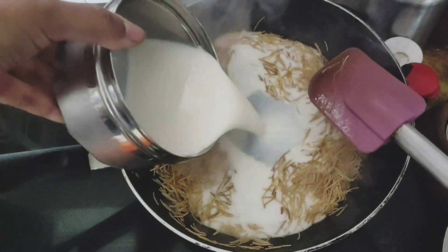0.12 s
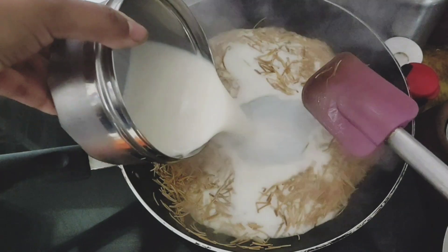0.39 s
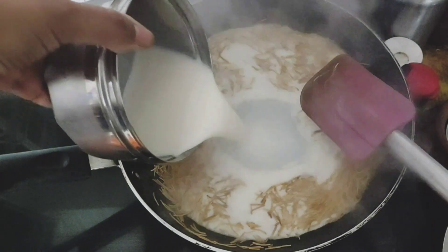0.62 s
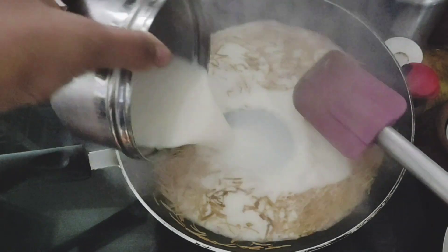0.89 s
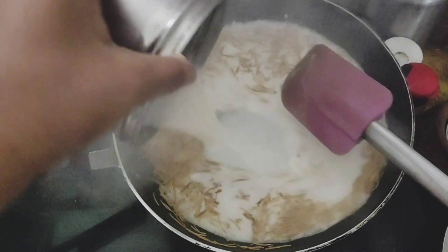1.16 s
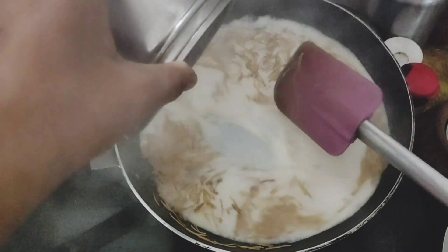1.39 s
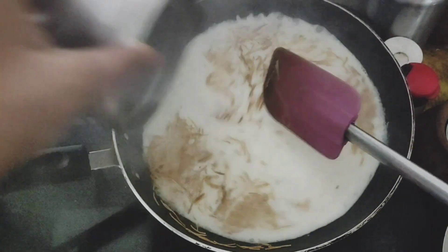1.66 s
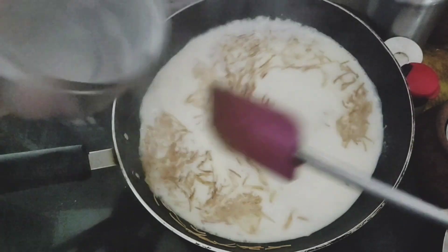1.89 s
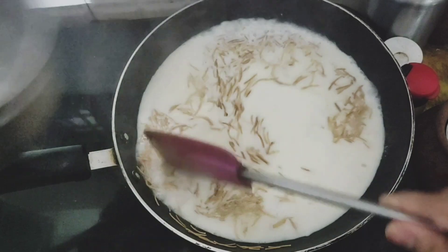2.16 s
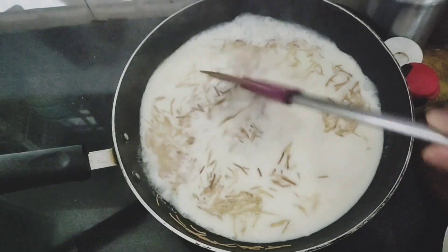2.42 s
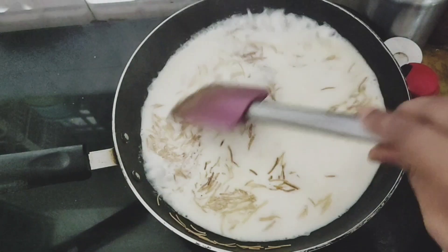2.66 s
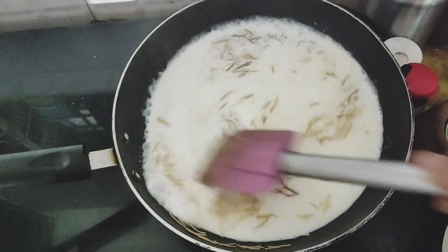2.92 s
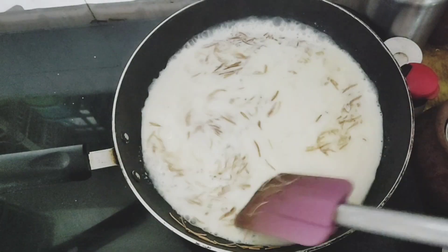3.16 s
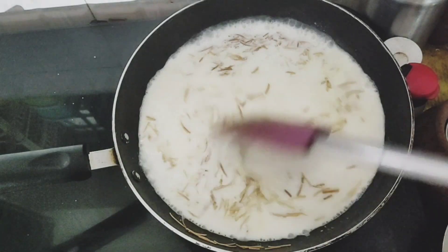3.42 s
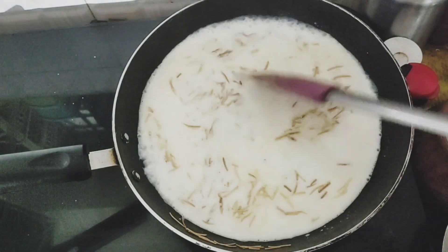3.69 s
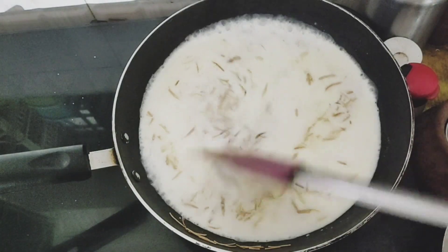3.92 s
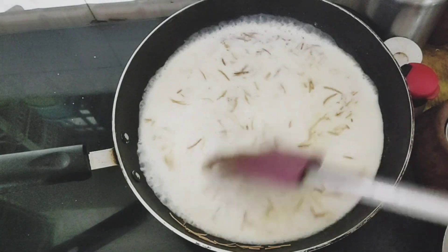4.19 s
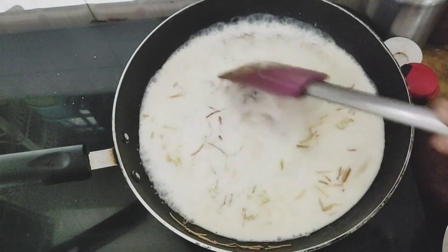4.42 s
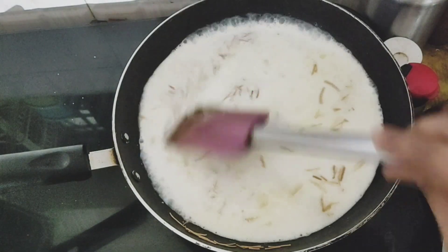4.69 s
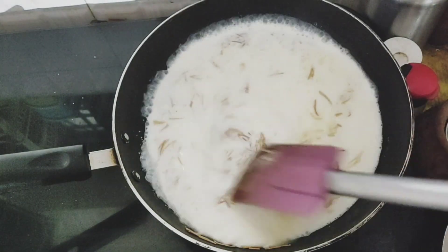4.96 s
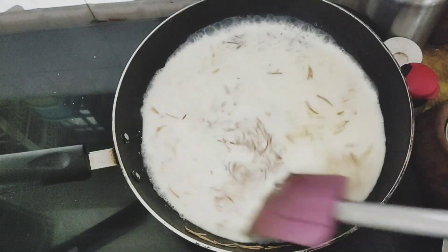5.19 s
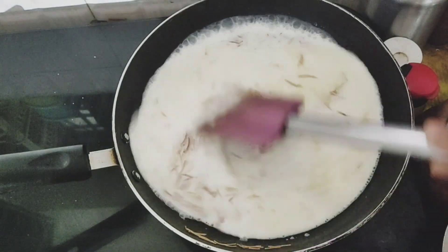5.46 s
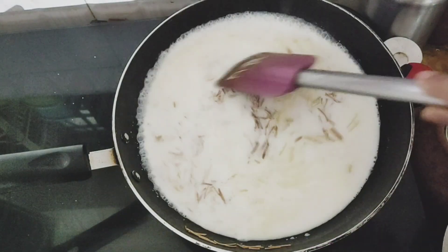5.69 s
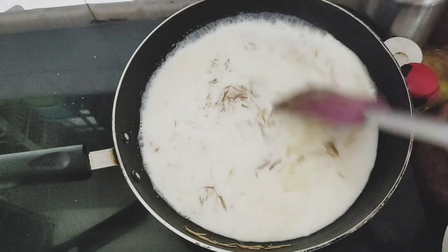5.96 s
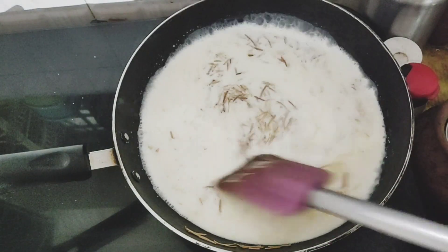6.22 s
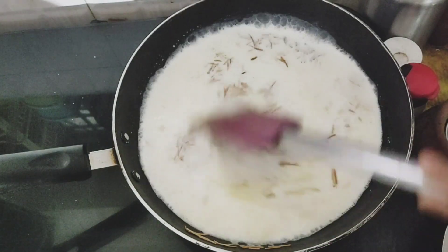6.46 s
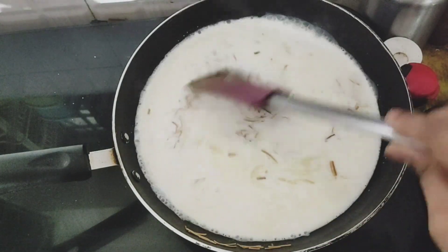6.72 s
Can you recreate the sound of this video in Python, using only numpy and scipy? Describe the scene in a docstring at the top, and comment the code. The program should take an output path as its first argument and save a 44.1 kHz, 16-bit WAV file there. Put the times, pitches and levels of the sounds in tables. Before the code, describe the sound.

Milk hisses fiercely on hot steel, fading unevenly over a low burner rumble; small spatula knocks, then thin steam squeaks and sparse bubbles.

```python
"""Milk boils off the hot steel of a pan: a dense sizzle of bursting and ringing bubbles over hiss fades, then is quenched.
Noise bursts spit; a spatula knocks and scrapes the pan wall, ringing its modes; the last bubbles at the rim squeak
as thin breathy whistles, and a sparse simmer remains. A burner rumbles in filtered noise over a faint hum of sines,
and a puff of air pushes each microphone of a spaced pair."""
import sys
import numpy as np
from scipy import signal
from scipy.io import wavfile
from scipy.ndimage import uniform_filter1d

SR = 44100
rng = np.random.default_rng(int(sys.argv[2]) if len(sys.argv) > 2 else 0)


def log_audio(samples):
    """Write samples as a 16-bit WAV file to the path given in sys.argv[1]."""
    # one column per channel
    frames = np.atleast_2d(samples).T
    # limit to full scale, then quantise
    limited = np.clip(frames, -1, 1)
    pcm = np.round(limited * 32767).astype(np.int16)
    wavfile.write(sys.argv[1], SR, pcm)


def how_loud(loudness_db):
    """Turn decibels into a plain amplitude multiplier (0 dB gives 1, 20 dB gives 10)."""
    steps = np.asarray(loudness_db, float) / 20
    return 10 ** steps


N = 301644  # samples


def evened(x):
    """Scales to rms 1."""
    return x / np.sqrt(np.mean(abs(x) ** 2) + 1e-20)


def read(points, hz):
    """Reads a table on a log-frequency axis."""
    f, value = np.transpose(points)
    return np.interp(np.log(hz + 1), np.log(f + 1), value)


def add(mix, start_s, sound):
    """Mixes a sound in at start_s."""
    part = mix[..., round(start_s * SR):][..., :sound.shape[-1]]
    part += sound[..., :part.shape[-1]]


def bell(hz, center_hz, width_hz):
    """Gaussian bump of height 1 over frequency."""
    return np.exp(-0.5 * ((hz - center_hz) / width_hz) ** 2)


def band(x, order, lo_hz, hi_hz):
    """Butterworth band-pass."""
    return signal.lfilter(*signal.butter(order, [lo_hz, hi_hz], "band", fs=SR), x)


def wander(t, lo_hz, hi_hz):
    """Slow chance of rms 1: sines of random phase."""
    rates_hz = np.geomspace(lo_hz, hi_hz, num=30)
    return evened(sum(np.sin(2 * np.pi * (f * t + rng.random())) for f in rates_hz))


def pair(a, b, size, field_db):
    """Colours two unrelated signals by a dB field and blends them into a left-right pair."""
    # likeness of left and right: (frequency [Hz], share [0-1])
    likeness = [(60, 1), (140, 0.92), (210, 0.34), (330, 0.93), (500, 0.71), (770, 0.65), (1400, 0.39),
                (2200, 0.14), (3500, 0.2), (8000, 0.02)]
    # path difference to the spaced microphones: (frequency [Hz], phase by which left leads [rad])
    lead = [(0, -0.3), (1400, 0.0), (2500, 0.0), (3900, -3), (9100, -8.8), (15300, -14)]
    overlap = size - size // 4
    hz, t, z = signal.stft([a, b], SR, nperseg=size, noverlap=overlap)
    power = uniform_filter1d((abs(z) ** 2).mean((0, 2)), size=9)
    z = z / np.sqrt(power)[:, None]
    same = np.clip(read(likeness, hz), 0, 1)[:, None]
    phase_rad = np.interp(hz, *np.transpose(lead))[:, None]
    left = (same * z[0] + np.sqrt(1 - same ** 2) * z[1]) * np.exp(1j * phase_rad)
    both = np.array([left, z[0]]) * how_loud(field_db(hz[:, None], t))
    return signal.istft(both, SR, nperseg=size, noverlap=overlap)[1][:, :N]


def bubbles(per_s, spread_db, cycles):
    """Bursting bubbles of many sizes, each a few cycles of rising pitch."""
    out = np.zeros((2, N))
    for hz in np.geomspace(350, 15000, num=16):
        u = np.arange(round(3 * cycles * SR / hz)) * hz / SR  # time in cycles
        pop = np.sin(2 * np.pi * u * (1 + 0.02 * u)) * np.exp(-u / cycles) * np.minimum(u / 0.27, 1)
        pop = evened(pop) / np.sqrt(len(u))
        share = hz / 60000  # small bubbles are the more numerous
        when, big = rng.random((2, 2, N))
        size_db = spread_db * np.minimum(-np.log(big + 1e-9), 5)
        train = (when < per_s * share / SR) * how_loud(size_db)
        out += signal.oaconvolve(train / np.sqrt(share), pop[None], axes=1)[:, :N]
    return evened(out)


def ringers(count, spread_db, cycles):
    """Bubbles held under the skin of the milk ring for many cycles, each at its own gliding pitch."""
    out = np.zeros((2, N))
    for when, size, big, side, glide in rng.random((count, 5)):
        hz = 400 * 35 ** size
        u = np.arange(round(3 * cycles * SR / hz)) * hz / SR  # time in cycles
        ring = np.sin(2 * np.pi * u * (1 + 0.0388 * (glide - 0.3) * u / cycles))
        ring = ring * np.exp(-u / cycles) * np.minimum(u / 6, 1)
        size_db = -spread_db * np.log(big + 0.018)
        add(out[int(side < 0.5)], when * N / SR, how_loud(size_db) * ring)
    return evened(out)


def sizzle():
    """Bubble bursts over their diffuse hiss, surging as milk washes over hot steel."""
    # boil at the rim, flaring when stirring bares hot steel: (time [s], level before side gain and swell [dB])
    boil = [(0.0, -19), (0.55, -19), (1.2, -24), (1.76, -27), (1.82, -24.5), (1.87, -27), (1.95, -27.5),
            (2.08, -28), (2.21, -31.5), (2.35, -29), (2.95, -31.5), (3.2, -29), (3.25, -29.5), (3.3, -33),
            (3.41, -32), (3.46, -35), (3.5, -33), (3.58, -35), (3.83, -33), (4.06, -35.5), (4.19, -33),
            (4.28, -33.5), (4.4, -36), (4.45, -35), (4.65, -37.5), (4.89, -36), (4.97, -34), (5.005, -33),
            (5.035, -35), (5.075, -36), (5.13, -32), (5.22, -34.5), (5.39, -38), (5.57, -38), (5.64, -45.5),
            (5.78, -53.5), (6.11, -54.5), (6.19, -51.5), (6.27, -52), (6.84, -56)]
    # basic spectrum: (frequency [Hz], relative density [dB per Hz])
    fizz = [(88, -40), (150, -17.5), (296, -10.5), (404, -8), (563, -7), (711, -5), (1090, -7), (1580, 1.5),
            (6920, -5.5), (8900, -4.5), (15600, -8)]
    # resonances and dips of pan bowl and microphone: (centre [Hz], width [Hz], gain before depth share [dB])
    bowl_modes = [(265, 24, -6), (408, 49, 1), (530, 11.5, 4.5), (575, 40, -11.5), (721.6, 13, 6),
                  (872, 22, 7), (1017, 57, 5.5), (1204, 15, 7.5), (1720, 32, -3), (2090, 30, -1.5),
                  (3020, 100, 0.5), (3800, 590, 2.5), (7500, 830, -2), (8640, 670, 4)]
    # colour, each column taken about its mean: (time [s], treble over sizzle [dB], low mids over sizzle [dB])
    colours = [(0.0, -3, -13), (1.3, -2, -8.5), (3.0, -1, -8), (3.25, -2, -7.5), (3.32, -4.5, -9),
               (3.55, -4, -10), (3.9, -3, -10.5), (4.25, -2.5, -9), (4.35, -4, -10), (4.6, -2.5, -10.5),
               (5.5, -1, -9.5), (5.64, -6.5, -11), (5.85, -0.5, -8.5), (6.19, 4, -5.5), (6.27, -1, -5.5),
               (6.84, 0, -9)]
    # mids: (time [s], 2-3 kHz over 1-1.7 kHz [dB], bowl resonance depth [share], nearby echo [0-1])
    mids_shape = [(0.0, -1.5, 1.1, 0.05), (.4, 0.5, 0.97, 0.1), (1.0, -2.5, 1.05, 1), (1.58, 2, 0.74, 0.8),
                  (1.75, -4.9, 0.72, 0.3), (2.4, -0.5, 1.04, 0), (2.95, 1.5, 0.91, 0), (3.2, 4, 1.1, 0.2),
                  (3.3, 1, 1.1, .1), (3.6, 0.3, 1.07, .05), (4.4, 1, 1.27, .05), (4.9, -1.7, 1.01, .05),
                  (5.12, 3.5, 0.97, .05), (5.5, -0.5, 1.4, 0.4), (5.7, 0.5, 0.45, .05),
                  (6.84, 3, 0.41, .05)]
    # colour that the nearby echo adds at full share: (centre [Hz], width [Hz], gain [dB])
    near_echo = [(794, 90, 1), (1026, 48, -9)]
    boil_s, level_db = np.transpose(boil)
    colour_s, treble_db, foam_db = np.transpose(colours)
    mids_s, *mids = np.transpose(mids_shape)
    bursts = bubbles(per_s=9000., spread_db=1.0, cycles=1.36)
    rings = ringers(count=2500, spread_db=2.0, cycles=39.0)
    drive = 0.55 * bursts + 0.28 * rings + 0.71 * rng.standard_normal((2, N))

    def field_db(hz, t):
        """Spectrum over time in dB: bowl, echo, colour, patches and surge."""
        below_peak_db = np.interp(t, boil_s, level_db - level_db.max())
        octave = np.log2(np.maximum(hz, 100) / 3000)

        tilt_db, depth, near = (np.interp(t, mids_s, v) for v in mids)
        bowl = sum(db * bell(hz, f, w) for f, w, db in bowl_modes)
        echo = sum(db * bell(hz, f, w) for f, w, db in near_echo)
        tilt = bell(hz, 2500, 550) - bell(hz, 1350, 350)
        bowl = bowl * depth + echo * near + 0.5 * tilt * tilt_db

        patches = rng.standard_normal((len(t), len(hz))).T
        patches = uniform_filter1d(patches, size=7, axis=0)
        patches = evened(uniform_filter1d(patches, size=20, axis=1))
        patches = patches * (1.05 - 0.02 * below_peak_db)  # dB, patchier as the boil weakens

        high = np.clip(octave - 0.6, 0, 1)
        low = np.clip((-octave - 1.1) / 0.5, 0, 1)
        treble = np.interp(t, colour_s, treble_db - treble_db.mean()) + 0.9 * wander(t, 1.605, 13.0)
        foam = np.interp(t, colour_s, foam_db - foam_db.mean()) + 0.43 * wander(t, 1.9, 8.5)
        colour = high * treble + low * foam
        # a weaker boil is duller on top and thinner at the bottom
        colour = colour + 0.28 * np.clip(octave - 1.6, 0, 1) * below_peak_db
        colour = colour + 0.18 * np.clip((-octave - 3.1) / 0.3, 0, 1) * below_peak_db

        surge = wander(t, 5., 40.) * (0.66 + 0.17 * np.maximum(octave + 1, 0))  # treble surges most
        return read(fizz, hz) + bowl + colour + patches + surge

    steady = pair(*drive, size=1024, field_db=field_db)
    middle = band(steady, 2, 1200, 5000)  # its power sets the level
    power = uniform_filter1d((middle ** 2).mean(0), size=16000)
    t = np.arange(N) / SR
    swell_db = -0.28 * wander(t, 2.5, 8.)
    return steady / np.sqrt(power) * how_loud(np.interp(t, boil_s, level_db) + swell_db)


def burner():
    """Lumpy low roar of the flame, filtered noise, and a faint hum of steady sines."""
    # burner: (time [s], rumble before side gain [dB], hum before partial levels [dB])
    flame = [(0.0, -52, -59.5), (1.0, -56.5, -61), (1.29, -49.5, -62), (2.0, -57, -59),
             (2.11, -49.5, -55.5), (2.66, -54, -61), (2.72, -45, -51.5), (2.8, -48, -54), (2.88, -45, -57),
             (2.96, -56, -58), (3.07, -52, -58), (3.2, -54, -52.5), (3.4, -54, -64), (3.69, -58, -63),
             (3.76, -49, -59), (3.83, -53, -59), (3.87, -45, -59), (4.04, -44.5, -59), (4.09, -52, -60.5),
             (4.5, -50, -58), (5.45, -55, -65), (5.7, -61, -63.5), (5.8, -51.5, -64.5), (6.0, -56, -65),
             (6.55, -55, -66), (6.72, -54, -65), (6.84, -48, -64)]
    # roar spectrum: (frequency [Hz], relative density [dB per Hz])
    roar_shape = [(12, -55), (20, -5), (37, -45), (82, 0.5), (101, 7), (113, 5.5), (126, 5), (145, 0),
                  (170, 1.5), (258, -17), (338, -7), (369, -18), (490, -9), (700, -34), (910, -54),
                  (1540, -120)]
    # hum partials: (frequency [Hz], relative level [dB])
    hum_partials = [(166.8, -4), (333.7, 0)]
    t = np.arange(N) / SR
    flame_s, roar_db, hum_db = np.transpose(flame)

    def field_db(hz, frame_s):
        """Roar spectrum, its level wavering."""
        return read(roar_shape, hz) + 1.5 * wander(frame_s, 3., 20.0)

    roar = pair(*rng.standard_normal((2, N)), size=2048, field_db=field_db)
    roar = evened(roar) * how_loud(np.interp(t, flame_s, roar_db)) * how_loud([[0.7], [-0.7]])
    hum = sum(how_loud(db) * np.sqrt(2) * np.sin(2 * np.pi * (hz * t + rng.random())) for hz, db in hum_partials)
    return roar + hum * how_loud(np.interp(t, flame_s, hum_db))


def puffs():
    """A fast push of air amid low buffeting; the capsule vent lets it swing back below rest."""
    # first on the left microphone, second on the right:
    # (time [s], push peak [dB], decay constant [s], buffeting before its envelope [dB])
    gusts = [(0.4094, -3, 0.00098, -41), (0.7213, -17.5, 0.00077, -45)]
    buffet_s, buffet_hz = 0.03, 250.
    out = np.zeros((2, N))
    t, now = np.arange(2000) / SR, np.arange(N) / SR
    vent = signal.butter(2, 100., "high", fs=SR)
    for side, (start_s, db, decay_s, buffet_db) in enumerate(gusts):
        push = np.minimum(t / decay_s / 0.47, 1) * np.exp(-t / decay_s)
        swing = signal.lfilter(*vent, push)
        add(out[side], start_s, how_loud(db) * swing / swing.max())
        low_air = signal.lfilter(*signal.butter(2, buffet_hz, fs=SR), rng.standard_normal(N))
        air = evened(signal.lfilter(*vent, low_air))
        add(out[side], 0, how_loud(buffet_db) * air * np.exp(-abs(now - start_s) / buffet_s))
    return out


def spits():
    """Larger bubbles spit: each a sharp decaying burst of noise coloured around its pitch."""
    # (time [s], level of the resonant part at the start [dB rms], pitch [Hz], t60 [s])
    bursts = [(1.792, -17, 4080, .04), (1.8123, -16, 3000, .05), (2.1177, -21, 1990, .035),
              (2.168, -23, 2560, .035), (2.3456, -15.5, 2000, .04), (3.0008, -20, 2590, .03),
              (3.4, -25, 1580, .035), (3.501, -26, 3990, .035), (3.631, -26, 2000, .015),
              (3.829, -23, 3300, .035), (4.489, -16, 3000, .006), (5.913, -44, 5500, .05),
              (6.422, -44, 2300, .02), (6.493, -41, 2540, .03), (6.512, -45, 2540, .03),
              (6.69, -45, 1700, .02)]
    out, t = np.zeros((2, N)), np.arange(3000) / SR
    for start_s, db, hz, t60_s in bursts:
        noise = rng.standard_normal((2, len(t)))
        ring = signal.lfilter(*signal.iirpeak(hz, 1.8, SR), noise)
        burst = evened(ring) + 0.6 * band(noise, 2, 700., 13000.)
        add(out, start_s, how_loud(db - 60 * t / t60_s) * np.minimum(t / 0.00075, 1) * burst)
    return out


def knocks():
    """A spatula's blow rings the pan modes through early room sound; its scrape stirs the damped modes."""
    # spatula on the pan wall: (time [s], blow [dB], scrape [dB rms], scrape length [s])
    blows = [(4.666, -38, -31, .066), (4.79, -49, -42, .02), (4.986, -43, -31, .045)]
    # pan modes: (frequency [Hz], relative level before chance [dB], undamped t60 [s])
    pan_modes = [(326, -15, .08), (455, -7, 0.18), (516, -1, 0.1), (576, -1, 0.32), (810, -1.5, 0.19),
                 (928, 4.5, 0.14), (1400, 2, 0.14), (1560, -15, .15), (2120, 0, 0.18), (2600, -1, 0.08),
                 (3990, 5, 0.065), (4500, 1, 0.07), (6800, -3, 0.1), (8240, 1, 0.1), (8570, 2, 0.099),
                 (8900, -1, .1)]
    rise_s, scrape_ring_db = 0.003, 0.5
    contact_damping = 0.5  # share of t60 left while touching
    out, t = np.zeros((2, N)), np.arange(20000) / SR
    for start_s, db, scrape_db, length_s in blows:
        chance = rng.random((len(pan_modes), 2))

        def modes(t60_share):
            """Sum of decaying sines."""
            return sum(how_loud(mode_db + 3.2 * v - 60 * t / (t60_s * t60_share)) * np.sin(2 * np.pi * (hz * t + p))
                       for (hz, mode_db, t60_s), (p, v) in zip(pan_modes, chance))

        ring, damped = modes(1), modes(contact_damping)
        room = rng.standard_normal((2, 6000)) * how_loud(-60 * t[:6000] / 0.33)
        room = room / np.linalg.norm(room[0])
        wet = signal.fftconvolve(ring[None], room, axes=1)[:, :len(t)]
        add(out, start_s, how_loud(db) * np.minimum(t / rise_s, 1) * (ring + 1.5 * wet))

        count = round(length_s * SR)
        rub = rng.standard_normal((2, SR // 5))[:, :count] * signal.windows.tukey(count, 0.35)
        add(out, start_s, how_loud(scrape_db) * evened(band(rub, 1, 500., 4000.)))
        stirred = signal.fftconvolve(rub, damped[None] / np.linalg.norm(damped), axes=1)
        add(out, start_s, how_loud(scrape_db + scrape_ring_db) * stirred)
    return out


def squeaks():
    """Thin breathy whistles of nearly level, slightly wavering pitch: a weak core in a sputtering fringe."""
    # steam from single spots: (start [s], length [s], nominal pitch [Hz], level before fades [dB rms])
    whistles = [(5.053, 0.12, 2680, -38), (5.09, .04, 1595, -41), (5.6, .09, 3200, -45),
                (5.67, .1, 3250, -50), (5.54, .07, 1450, -42), (5.59, .03, 1550, -48),
                (5.67, 0.1, 1500, -49), (5.641, 0.051, 1160, -54), (5.66, 0.11, 3600, -53),
                (5.571, 0.12, 2620, -49), (5.57, .08, 4500, -48), (5.7, .04, 4450, -52),
                (5.64, 0.17, 5870, -57), (5.76, .12, 3250, -57), (5.87, .09, 3300, -57),
                (5.858, 0.11, 8830, -46.5), (5.898, 0.094, 12100, -53), (6.127, 0.096, 9200, -49),
                (6.07, .05, 880, -58), (6.13, .07, 2800, -57), (6.16, .03, 1400, -56),
                (6.175, 0.045, 1780, -51), (6.2, .1, 4150, -58), (6.23, 0.07, 1740, -52),
                (6.3, .07, 1640, -55), (6.27, .04, 2200, -60), (6.34, 0.085, 3110, -50),
                (6.33, .1, 4900, -58), (6.36, .07, 5600, -57), (6.378, 0.096, 1614, -54.5),
                (6.425, .04, 3070, -55), (6.485, .07, 4150, -56), (6.415, .09, 2565, -47),
                (6.49, .125, 2560, -50), (6.49, 0.014, 2550, -41), (6.508, .016, 2550, -43),
                (6.484, 0.083, 3780, -50.5), (6.481, .08, 5430, -55), (6.55, .06, 1590, -55),
                (6.63, .1, 4020, -57), (6.756, .05, 3120, -56)]
    drift_per_s, waver = -0.038, 0.004  # shares of the pitch
    fringe = 1.6  # sputter over core
    out = np.zeros((2, N))
    for start_s, length_s, hz, db in whistles:
        count = round(length_s * SR)
        a, b = uniform_filter1d(rng.standard_normal((2, 2, SR // 2)), size=320)[..., :count]
        t = np.arange(count) / SR
        core = np.exp(2j * np.pi * rng.random((2, 1)))
        pitch_hz = hz * (1 + drift_per_s * t + waver * wander(t, 2.97, 14.7))
        tone = np.exp(2j * np.pi * np.cumsum(pitch_hz) / SR)
        whistle = ((core + fringe * evened(a + 1j * b)) * tone).real
        add(out, start_s, how_loud(db) * evened(whistle) * signal.windows.tukey(count, 0.3))
    return out


def simmer():
    """Once the sizzle is quenched, single bubbles stand out: long faint rings and fine crackle."""
    from_s, fade_s, level_db = 5.6, 0.1, -57.
    rings = ringers(count=600, spread_db=3.5, cycles=110.0)
    crackle = bubbles(per_s=360.0, spread_db=2.0, cycles=1.3)
    sound = band(rings + 0.5 * crackle, 1, 1000., 8000.)
    fade_in = np.clip((np.arange(N) / SR - from_s) / fade_s, 0, 1)
    return how_loud(level_db) * evened(sound) * fade_in


def scene():
    """All sources at the microphones."""
    side_gain = how_loud([[2.8], [2.3]])
    return sizzle() * side_gain + burner() + puffs() + spits() + knocks() + squeaks() + simmer()


def top_cut(x):
    """Nothing passes above the cut-off."""
    return signal.sosfilt(signal.butter(12, 15620, fs=SR, output="sos"), x)


def record(dry):
    """Clips at full scale."""
    mix = np.clip(dry, -1, 1)
    return top_cut(mix)


dry = scene()
out = record(dry)
log_audio(out)
```